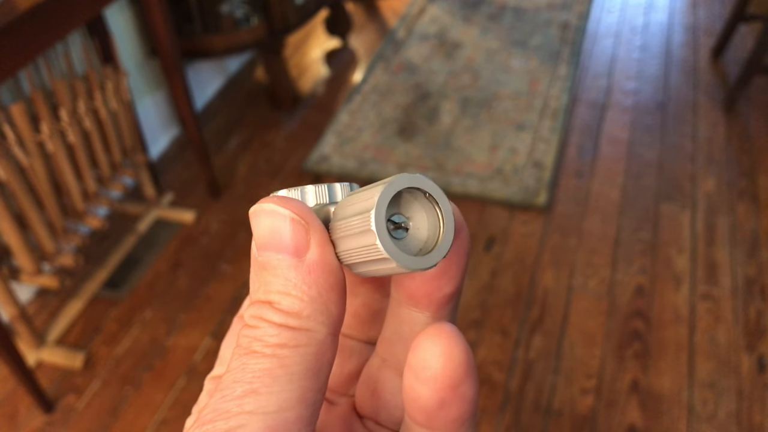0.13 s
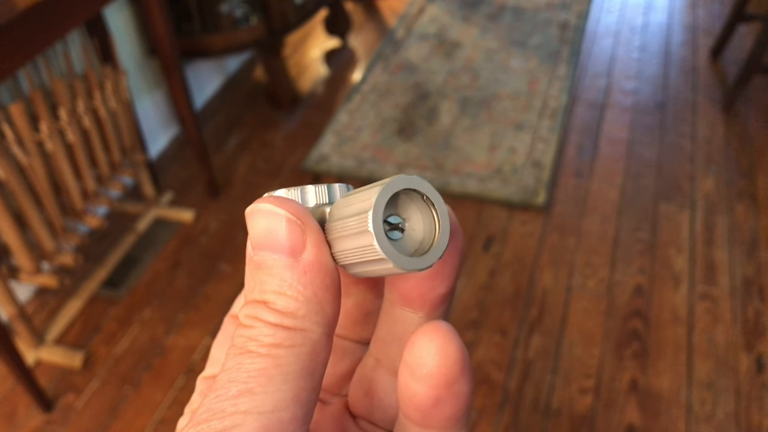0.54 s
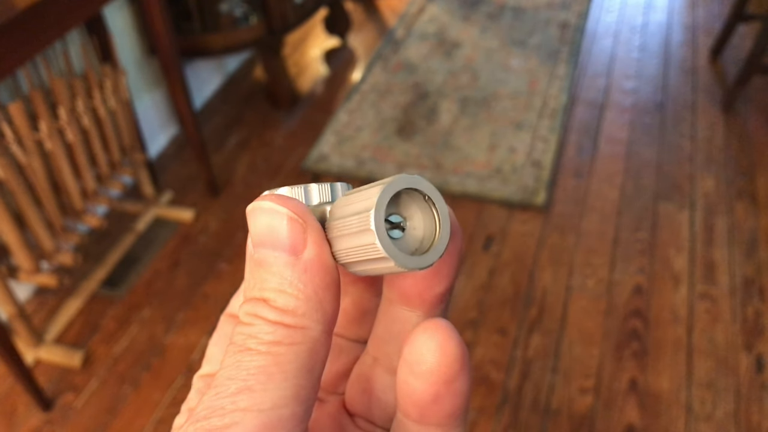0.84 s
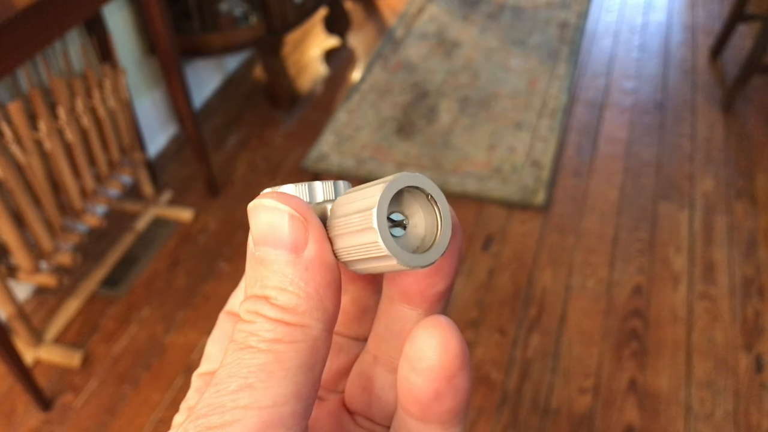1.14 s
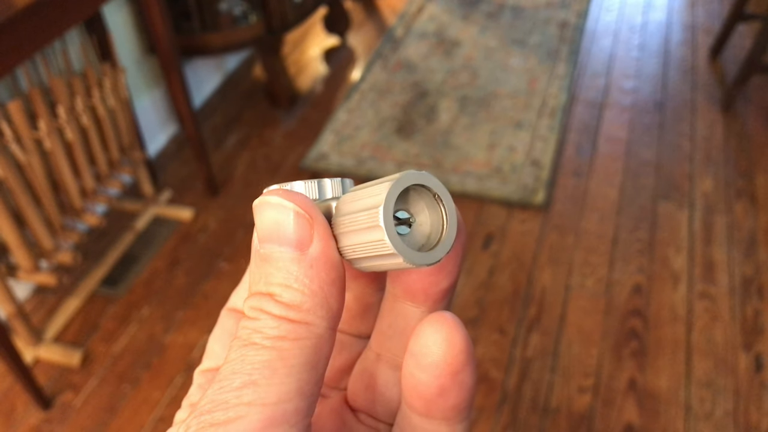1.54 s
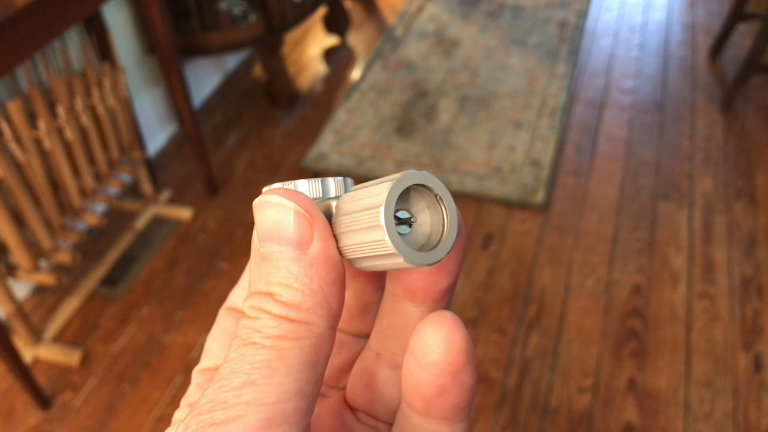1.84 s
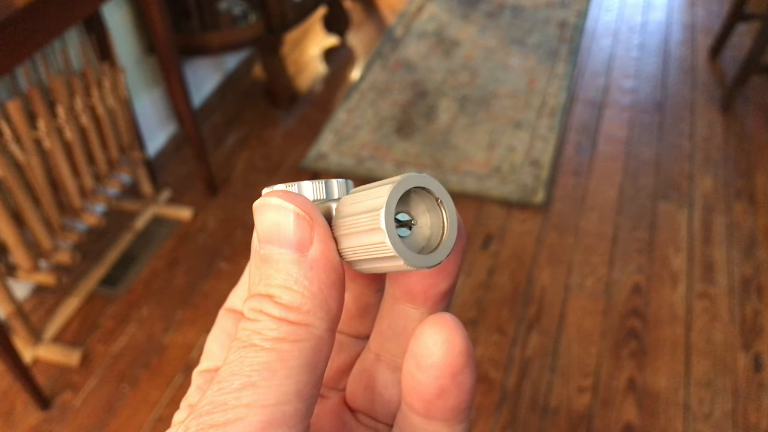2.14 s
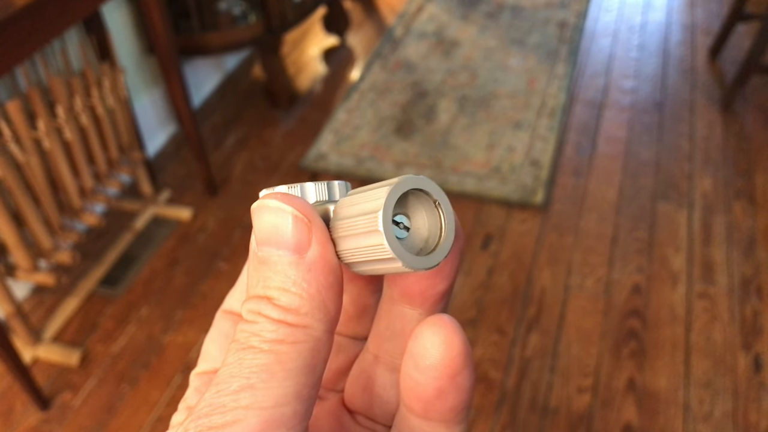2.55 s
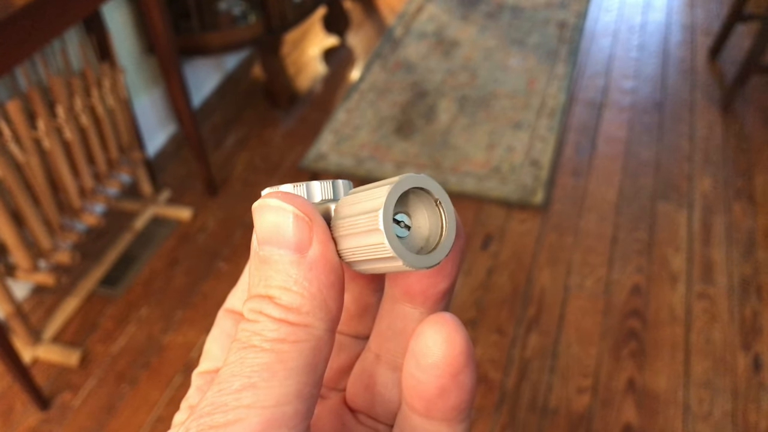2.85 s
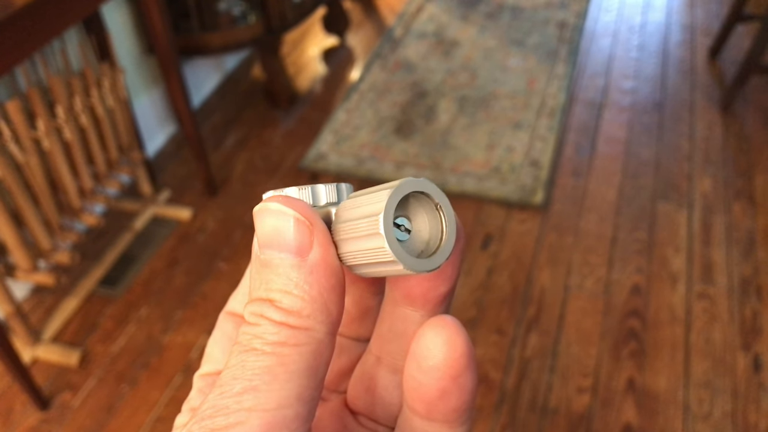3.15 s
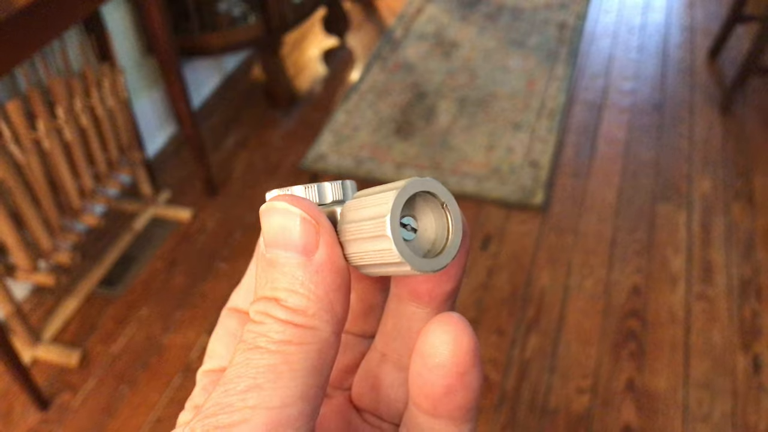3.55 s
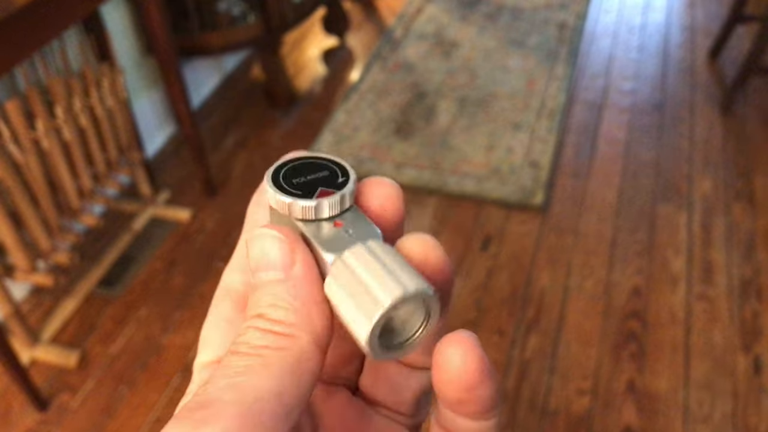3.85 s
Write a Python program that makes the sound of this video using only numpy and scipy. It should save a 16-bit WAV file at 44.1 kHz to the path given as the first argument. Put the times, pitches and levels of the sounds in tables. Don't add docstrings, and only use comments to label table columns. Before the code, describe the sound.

Close-miked clockwork buzz from a tiny metal timer, bright and dry with wavering speed, a single loud snap past midway, then a quick run-down to silence with faint skin rustle and low hum in a quiet wooden-floored room.

```python
import sys
import numpy as np
from scipy import signal
from scipy.fft import rfft, irfft, next_fast_len
from scipy.io import wavfile
from scipy.ndimage import uniform_filter1d, minimum_filter1d, map_coordinates

SR = 44100
rng = np.random.default_rng(int(sys.argv[2]) if len(sys.argv) > 2 else 0)


def volts_from_decibels(level):
    exponent = np.asarray(level, float) / 20
    return 10 ** exponent


def transcribe(signal):
    frames = np.atleast_2d(signal).T
    limited = np.clip(frames, -1, 1)
    pcm = np.round(limited * 32767).astype(np.int16)
    wavfile.write(sys.argv[1], SR, pcm)


N = 176400

# (centre [Hz], width [Hz], sign, level under light load [dB], under the
# pin's load [dB], as the pin slips [dB], after release [dB])
CASE_MODES = [(2030, 990, 1, -5, -5.5, -4.5, -4.5), (2400, 440, -1, 2, .5, 2, -1),
              (2880, 320, 1, -1, -3.5, -4.5, -2), (4350, 360, -1, -6, -7.5, -6.5, -12.5),
              (5390, 580, 1, -8.5, -5.5, -8, -5.5), (6760, 780, -1, -7, -5.5, -6.5, -5.5),
              (8350, 550, -1, -14.5, -10, -7.5, -8.5), (9680, 760, 1, -8.5, -7, -7, -7),
              (10660, 520, -1, -7.5, -8.5, -8, -8), (12060, 1030, 1, -1.5, -4, -4, -2),
              (13010, 860, -1, -2, -3, -4, -3.5),
              (14340, 1250, 1, -5.5, -5, -5.5, -5), (15610, 360, -1, 1, -.5, -2.5, -2)]


def unit(x):
    return x / np.sqrt(np.mean(x ** 2) + 1e-20)


def along(points, hz):
    f, v = np.transpose(points)
    return np.interp(np.log(hz + 1), np.log(f + 1), v)


def wobble(rate):
    knots = rng.standard_normal(int(N * rate / SR) + 4)
    return map_coordinates(knots, [np.arange(N) * rate / SR])


def filtered(x, response):
    m = next_fast_len(N + SR // 2)
    return irfft(rfft(x, m) * response(np.fft.rfftfreq(m, 1 / SR)), m)[..., :N]


def coloured(x, curve):
    return filtered(x, lambda f: volts_from_decibels(along(curve, f)))


def metal(modes):
    def response(f):
        radiation = (1j * f / (2037 + 1j * f)) ** 4
        return radiation * sum(g * 1j * f * w / (c * c - f * f + 1j * f * w) for c, w, g in modes)
    return response


def case_modes(state):
    return [(hz, width, sign * volts_from_decibels(levels[state])) for hz, width, sign, *levels in CASE_MODES]


def chatter(times, db, t60, rise_s, blow_db=-60, blow_hz=4000):
    t = np.arange(SR // 20) / SR
    samples = np.clip(np.round(np.asarray(times) * SR).astype(int), 0, N - 1)
    marks = np.bincount(samples, volts_from_decibels(db), N)
    shape = volts_from_decibels(-60 * t / t60) * (1 - np.exp(-t / rise_s)) ** 2
    grit = signal.fftconvolve(marks, shape / shape.max())[:N] * rng.standard_normal(N)
    blow = filtered(marks, lambda f: np.exp(-2j * np.pi * f * rise_s) / (1 + 1j * f / blow_hz) ** 2)
    return grit + volts_from_decibels(blow_db) * blow


def escapement():
    # (time [s], pallet swings [per s], level [dB])
    drive = [(0, 168, -34), (.65, 181, -34.5), (1.3, 174.6, -34.5), (1.7, 155.8, -34.5), (2.3, 171, -35),
             (2.45, 184, -36.5), (2.9, 170.8, -34.5), (3.345, 175, -35), (3.36, 74, -35),
             (3.382, 114, -68.5), (3.389, 100, -76), (4, 100, -86)]
    # (time [s], speed lost [swings per s])
    mesh = [
        (.36, 9),
        (0.709, 13),
        (1.09, 11.95),
        (1.45, 14.84),
        (1.84, 12),
        (2.22, 11),
        (2.66, 11),
        (2.98, 13),
    ]
    # (frequency [Hz], level [dB])
    tock_colour = [(1500, -8), (2800, -6.5), (3600, -9), (4300, 3), (4900, -4), (5600, -1), (9000, 0),
                   (16000, .5)]
    # (frequency [Hz], level [dB])
    around = [(1300, -36), (2500, -9), (6000, -2), (8000, -4), (12000, 1), (16000, 1)]
    t = np.arange(N) / SR
    s, rate, level = np.transpose(drive)

    recover_s, wheel_teeth, wheel_wobble, drift = .12, 13.2, 4, 2.5
    dips = sum(loss * np.exp(-abs(t - at) / np.where(t > at, recover_s, .012)) for at, loss in mesh)
    base = np.interp(t, s, rate)
    wheel = wheel_wobble * np.sin(2 * np.pi * np.cumsum(base) / SR / wheel_teeth)
    uneven = dips.mean() - dips + wheel + drift * wobble(25)
    swing = np.cumsum(base + uneven) / SR

    jitter_s, scatter_db = .00013, 1
    count = np.arange(int(swing[-1]))
    luck = rng.standard_normal((800, 4))[:len(count)]
    beats = []
    for k, (at, db) in enumerate([(0, 0), (.53, -2.8)]):
        times = np.interp(count + at, swing, t) + jitter_s * luck[:, k]
        size = db + scatter_db * luck[:, 2 + k]
        contact = chatter(times, size, t60=.0028, rise_s=.00013, blow_db=21.5, blow_hz=6000)
        rattle = chatter(times, size - 20, t60=.03, rise_s=0.002)
        beats.append(contact + rattle)
    tick, tock = beats
    force = tick + coloured(tock, tock_colour)

    shift_s = .04
    push, slip, free, slack = [1 / (1 + np.exp(-np.clip((t - at) / shift_s * 4, -50, 50)))
                               for at in (.93, 2.12, 2.41, 2.97)]
    back = .3 * slack
    light, loaded, slipping, released = [unit(filtered(force, metal(case_modes(k)))) for k in range(4)]
    buzz = (1 - push) * light + (push - slip) * loaded
    buzz = buzz + (slip - free + back) * slipping + (free - back) * released

    tighten_s = .33
    looseness = 1 / (1 + (t / tighten_s) ** 6) + slack / 2
    buzz = buzz + volts_from_decibels(-18) * looseness * unit(filtered(force, metal([(2250, 500, -1)])))

    spread = unit(coloured(force, around))
    db_per_speed = 0.0475
    loudness = np.interp(t, s, level) + db_per_speed * uneven + 0.2 * wobble(3.3)
    return np.array([buzz, spread]) * volts_from_decibels(loudness)


def release():
    # (time [s], peak level [dB])
    snap = [
        (2.3882, -26),
        (2.3897, -18),
        (2.3906, -4),
        (2.393, -14),
        (2.3937, -12),
        (2.397, -26),
        (2.4027, -31),
    ]
    # (centre [Hz], width [Hz], sign, level [dB])
    pin = [(1550, 450, -1, -8), (2050, 500, 1, -4), (2870, 700, -1, -5), (4500, 900, 1, -3),
           (5800, 1000, -1, -3), (6900, 800, 1, -5), (9400, 700, 1, -4), (11500, 700, -1, -2),
           (12800, 700, 1, -4), (15300, 1200, -1, -5)]
    # (time [s], peak level [dB])
    last = [
        (3.3715, -19),
        (3.379, -26),
        (3.398, -30.5),
        (3.419, -34.5),
    ]
    pin_modes = [(hz, width, sign * volts_from_decibels(db)) for hz, width, sign, db in pin]
    strikes = chatter(*np.transpose(snap), t60=0.0016, rise_s=0.00058, blow_db=15, blow_hz=6860)
    touches = chatter(*np.transpose(last), t60=0.0019, rise_s=0.00019)
    return volts_from_decibels(6) * filtered(strikes, metal(pin_modes)) + volts_from_decibels(-6.0) * filtered(touches, metal(case_modes(3)))


def fingers():
    # (time [s], level [dB])
    rustle = [(3.47, -73), (3.555, -63.5), (3.578, -68), (3.598, -72), (3.65, -63.5), (3.71, -69),
              (3.78, -68.5), (3.84, -82), (3.875, -75.5), (3.925, -66), (3.95, -71.5)]
    # (frequency [Hz], level [dB])
    skin = [(4500, -34), (7000, -29.5), (9000, -25), (11000, -15.5), (13500, -9), (16000, -5.5)]
    t = np.arange(N) / SR
    puff_s, steady_db = 0.0072, -66
    puffs = volts_from_decibels(steady_db) + sum(volts_from_decibels(db) * np.exp(-((t - s) / puff_s) ** 2) for s, db in rustle)
    return puffs * volts_from_decibels(1.5 * wobble(220)) * unit(coloured(rng.standard_normal(N), skin))


def walls(x):
    # (frequency [Hz], t60 [s])
    decay = [(1000, .32), (4000, .32), (9000, .3), (16000, .24)]
    hz, t, z = signal.stft(rng.standard_normal(SR // 2), SR, nperseg=256)
    tail = signal.istft(z * volts_from_decibels(-60 * t / along(decay, hz)[:, None]), SR, nperseg=256)[1]
    return signal.fftconvolve(np.pad(x, (200, 0)), tail / np.linalg.norm(tail))[:N]


def appliance_hums():
    # (centre [Hz], width [Hz], level [dB])
    bands = [(120.61, 2.1, -63.5), (144.7, 23, -62), (241.27, 14, -68), (513, 20, -79.5)]
    total = 0
    for hz, width, db in bands:
        band = filtered(rng.standard_normal(N), lambda f: 1 / (1 + ((f - hz) / width * 2) ** 2))
        total = total + volts_from_decibels(db) * unit(band)
    return total


def motor_whines():
    # (frequency [Hz], level [dB], beats [per s], a loud moment [s], beat depth [0-1])
    whines = [(840, -70.5, 1.02, 0.79, 0.46), (1184, -77, 0.49, 3.6, 0.11)]
    t = np.arange(N) / SR
    total = 0
    for hz, db, beat, at, depth in whines:
        swell = 1 + depth * np.cos(2 * np.pi * beat * (t - at))
        total = total + volts_from_decibels(db - 1.5) * swell * np.sin(2 * np.pi * hz * t + 0.46 * wobble(8))
    return total


def hum_swells():
    # (time [s], level [dB])
    booms = [(0.099, -58.5), (0.358, -55.5), (.9, -56), (1.628, -57), (2.198, -52), (2.69, -52),
             (2.84, -54.5), (3.15, -55), (3.32, -51.5), (3.63, -52), (3.869, -57)]
    t = np.arange(N) / SR
    boom_hz, boom_s = 144.5, 0.076
    swell = sum(volts_from_decibels(db + 2.0) * np.exp(-((t - s) / boom_s) ** 2) for s, db in booms)
    return swell * np.sin(2 * np.pi * boom_hz * t + 2.15 * wobble(8.4))


def room_tone():
    # (frequency [Hz], level [dB per Hz])
    air_colour = [(22, -28), (45, -5.5), (90, -13), (240, -10), (500, -23.5), (1000, -25), (1600, -34.5),
                  (8000, -50.5)]
    air = volts_from_decibels(-57) * unit(coloured(rng.standard_normal(N), air_colour))
    return air + appliance_hums() + motor_whines() + hum_swells()


def scene():
    buzz, spread = escapement()
    snap = release()
    echo = volts_from_decibels(-17) * walls(spread + .5 * snap)
    return (buzz + snap + echo + fingers() + room_tone())[None]


def low_pass(x):
    return signal.sosfilt(signal.butter(12, 17000, fs=SR, output="sos"), x)


def record(dry):
    top_hz, edge_hz, sharp_peak = 15740, 16600, .3
    body = filtered(dry, lambda f: (f >= 0) & (f < top_hz))
    top = filtered(dry, lambda f: (f >= top_hz) & (f < edge_hz))
    peak = -minimum_filter1d(-abs(dry), size=120)
    sharp = uniform_filter1d(1. * (peak > sharp_peak), size=120)
    return low_pass(body + volts_from_decibels(-10) * sharp * top)


dry = scene()
out = record(dry)
transcribe(out)
```